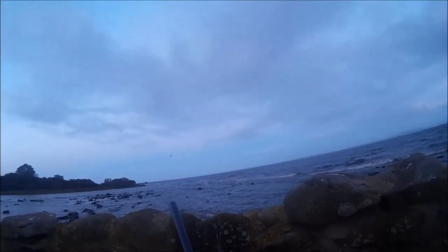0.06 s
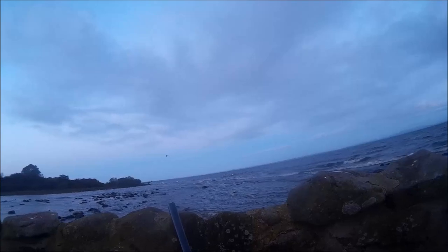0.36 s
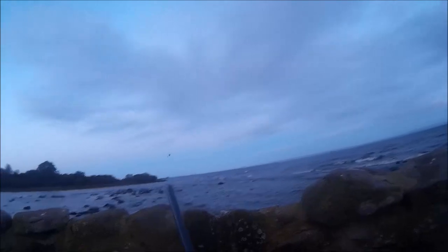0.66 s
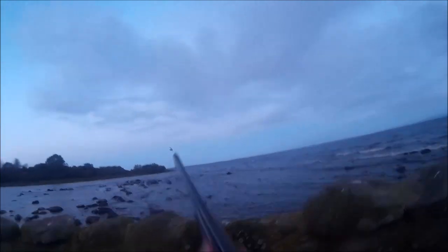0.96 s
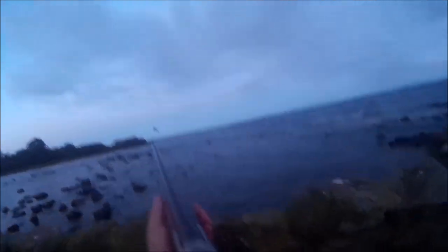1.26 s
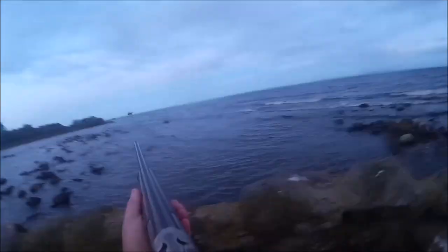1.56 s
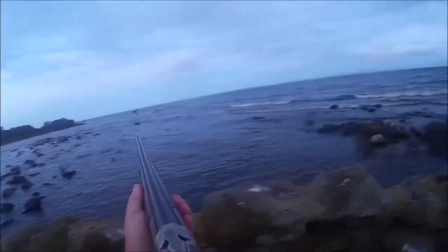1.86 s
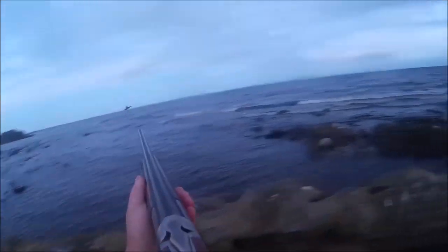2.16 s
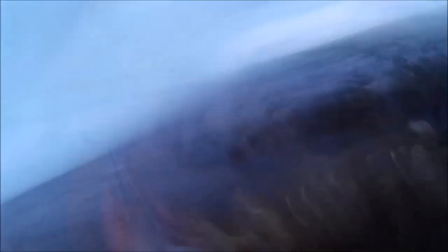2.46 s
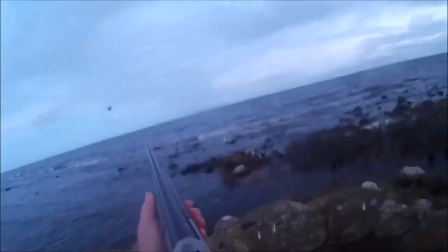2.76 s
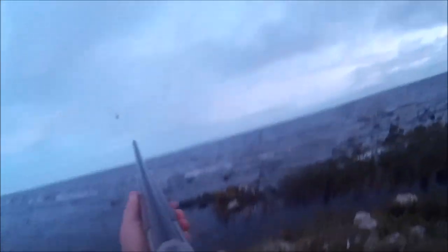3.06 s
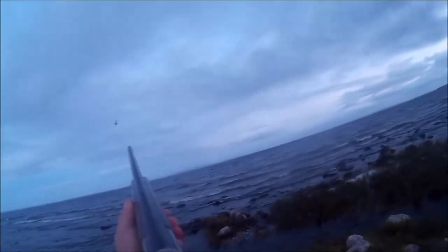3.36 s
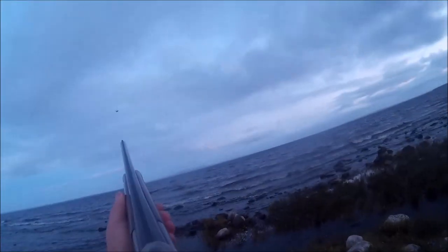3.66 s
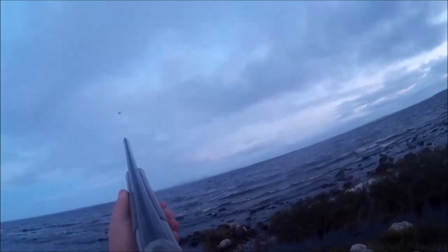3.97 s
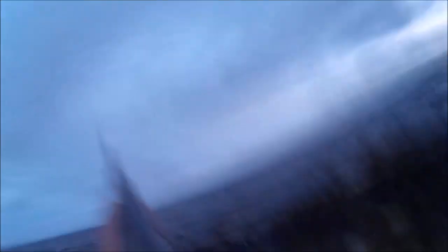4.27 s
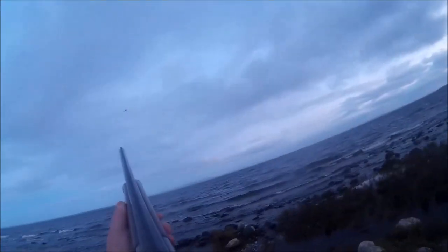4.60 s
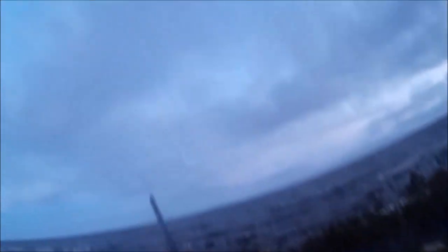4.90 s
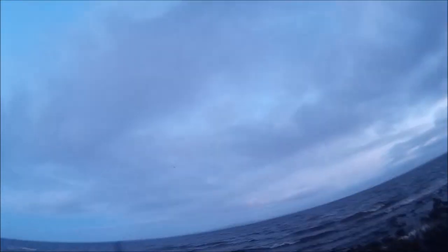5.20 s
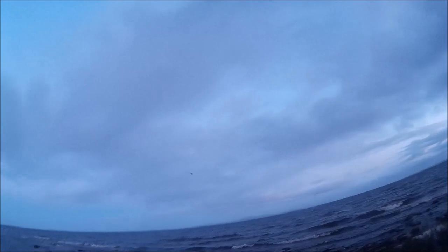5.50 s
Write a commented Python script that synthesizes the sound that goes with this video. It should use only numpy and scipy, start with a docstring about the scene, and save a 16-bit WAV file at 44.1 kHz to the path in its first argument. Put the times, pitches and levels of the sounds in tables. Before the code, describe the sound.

Boxy wind rumbles and slaps against an enclosed microphone as a shotgun fires twice, about two seconds apart, beside softly washing water.

```python
"""Two shotgun shots on a windy lake shore

A head-worn camera hears it all from inside a waterproof case, which booms near 500 Hz and shuts
out the treble. Gusts shake the case, slap it and rush past it over the steady wash of small waves.
Sleeves rustle as the gun comes up, and handling knocks the case. Each blast overloads the recorder
into square waves, the recoil jolts the case, the barrels ring and the echo rolls away over the water."""
import sys
import numpy as np
from scipy import signal
from scipy.fft import rfft, irfft, next_fast_len
from scipy.io import wavfile
from scipy.ndimage import uniform_filter1d

SR = 44100
rng = np.random.default_rng(int(sys.argv[2]) if len(sys.argv) > 2 else 0)


def master_out(mix):
    """Clip the mix to full scale and print it as 16-bit PCM to the path in sys.argv[1]."""
    frames = np.transpose(np.atleast_2d(mix))
    ceiling = np.clip(frames, -1, 1)
    pcm = np.round(ceiling * 32767).astype(np.int16)
    wavfile.write(sys.argv[1], SR, pcm)


N = 248724
T = np.arange(N) / SR


def undb(db):
    """Turn decibels into a number to multiply by."""
    return 10 ** (np.asarray(db) / 20)


def unit(x):
    """Scale a signal to an average size (rms) of 1."""
    return x / np.std(x)


def colour(x, points):
    """Shape the tone along (frequency [Hz], level [dB]) points."""
    hz, db = np.transpose(points)
    size = next_fast_len(N + 8192, True)
    size += size % 2
    freqs = np.maximum(np.arange(size // 2 + 1) * SR / size, 1)
    gain = undb(np.interp(np.log(freqs), np.log(hz), db))
    # minimum phase: the filter rings after a sound, never before it
    cepstrum = irfft(np.log(gain))
    cepstrum[1:size // 2] *= 2
    cepstrum[size // 2 + 1:] = 0
    return irfft(rfft(x, size) * np.exp(rfft(cepstrum)))[:N]


def noise_band(low_hz, high_hz):
    """Noise between two frequencies, of size 1."""
    bandpass = signal.butter(2, [low_hz, high_hz], "band", fs=SR, output="sos")
    return unit(signal.sosfilt(bandpass, rng.standard_normal(N)))


def wander(per_second):
    """A curve of size 1 that glides from one random value to the next."""
    step = max(int(SR / per_second), 2)
    stairs = np.repeat(rng.standard_normal(N // step + 1), step)
    return unit(uniform_filter1d(stairs, step)[:N])


def steady(x, seconds, crest=1.4):
    """Even out a noise's slow changes, keep its flutter and soften surges above crest."""
    x = x / np.sqrt(uniform_filter1d(x ** 2, int(seconds * SR)) + 1e-9)
    surge = uniform_filter1d(uniform_filter1d(2 * x ** 2, size=180), size=180)
    return unit(x / (1 + (surge / crest ** 2) ** 2) ** (1 / 4))


def swell(start, rise, hold, release):
    """Rise in a straight line, hold, then fall to about a third every release seconds."""
    age = T - start
    return np.clip(age / rise, 0, 1) * np.exp(-np.maximum(age - rise - hold, 0) / release)


def fade(start, t60):
    """Start suddenly, then die away by 60 dB in t60 seconds."""
    return (T >= start) * np.exp(-np.log(1000) * np.maximum(T - start, 0) / t60)


def ring(start, hz, t60):
    """One dying tone of something struck."""
    return np.sin(2 * np.pi * hz * (T - start)) * fade(start, t60)


# How much sound gets into the closed case: (frequency [Hz], level [dB])
CASE_TONE = [(25, -26.5), (80, -18.5), (220, -11), (360, -8.5), (440, -3.5), (505, -2.5), (600, -7.5),
             (800, -14.5), (1200, -25.5), (2000, -22.5), (2450, -38), (3200, -53), (5000, -62.5),
             (15000, -69)]

def through_case(x):
    """The case lets in tones near 500 Hz best and muffles the treble."""
    return colour(x, CASE_TONE)


def cased_noise(tone, flutter_db=0):
    """Noise of size 1 heard through the case; flutter_db makes its level flicker quickly."""
    noise = rng.standard_normal(N) * undb(flutter_db * wander(110))
    return unit(through_case(colour(noise, tone)))


# The wind between gusts: (time [s], buffeting strength [dB], rumble strength [dB])
BREEZE = [(0, -61, -75), (.48, -58.5, -69.5), (.66, -62, -52), (.82, -60, -61.5), (1.0, -46, -42.5),
          (1.03, -52.5, -53), (1.12, -37.5, -45.5), (1.41, -43.5, -43.5), (1.58, -37.5, -41),
          (1.615, -50, -48), (1.66, -41, -43), (1.84, -38.5, -38.5), (2.1, -35.5, -39),
          (2.329, -32.5, -36.5), (2.5, -36.5, -47.5), (2.6, -45.5, -41.5), (2.76, -40.5, -44),
          (2.91, -42.5, -45.5), (3.048, -34, -46.5), (3.26, -31, -43), (3.44, -35.5, -43),
          (3.72, -38.5, -47), (3.95, -35, -42), (4.14, -33.5, -43.5), (4.329, -41.5, -45), (4.7, -38, -42),
          (4.98, -39, -46.5), (5.279, -37.5, -53), (5.461, -34, -50), (5.501, -49, -54), (5.55, -37, -46),
          (5.64, -38.5, -51.5)]
# Gusts that shake the case: (time [s], length [s], buffeting strength [dB], rumble strength [dB])
GUSTS = [(0.178, 0.0078, -45, -37.5), (0.212, 0.047, -69, -51.5), (0.56, 0.063, -59, -49),
         (0.702, 0.04, -49.5, -49), (0.899, 0.059, -38, -44), (1.057, 0.031, -31, -36.5),
         (1.103, 0.021, -40, -47.5), (1.16, 0.02, -35.5, -49), (1.223, 0.053, -38, -39.5),
         (1.283, 0.02, -30.5, -44), (1.329, 0.029, -38, -40.5), (1.475, 0.076, -32.5, -36.5),
         (1.554, 0.037, -31, -36), (1.645, 0.033, -35, -33), (1.701, 0.033, -34, -45),
         (1.891, 0.047, -29, -45), (1.996, 0.042, -32, -48), (2.125, 0.056, -34.5, -36.5),
         (2.195, 0.02, -29.5, -35), (2.235, 0.065, -30.5, -37), (2.613, 0.07, -35, -43),
         (2.691, 0.041, -33, -36.5), (2.772, 0.032, -30.5, -34), (3.351, 0.061, -33, -45.5),
         (3.441, 0.011, -31, -43.5), (3.472, 0.011, -34, -44.5), (3.574, 0.059, -33, -45.5),
         (3.8, 0.03, -33, -42), (3.877, 0.052, -28, -48), (4.194, 0.03, -45, -27.5),
         (4.54, 0.12, -39, -42.5), (4.687, 0.11, -32, -45.5), (4.837, 0.039, -35.5, -41.5),
         (5.112, 0.026, -32, -54), (5.192, 0.0194, -33.5, -52), (5.394, 0.041, -30.5, -44)]

def wind_force():
    """Gusts add their power to the breeze; gives the strength of buffeting and of rumble."""
    rise_s, release_s = 0.0031, 0.0079
    times, *levels = np.transpose(BREEZE)
    power = np.array([undb(np.interp(T, times, db)) ** 2 for db in levels])
    for start, length, buffet_db, rumble_db in GUSTS:
        shape = swell(start, rise_s, length - rise_s, release_s)
        power += np.outer(undb([buffet_db, rumble_db]), shape) ** 2
    return np.sqrt(power)


# Tone of the wind's beating and of its rumble, outside the case: (frequency [Hz], level [dB])
BUFFET_TONE = [(40, -21), (180, -11), (300, -4), (420, -3), (470, 0), (515, 4), (565, 0.5), (650, -4),
               (750, -7), (1000, -11), (1400, -20), (2200, -31), (6000, -43.5)]
RUMBLE_TONE = [(20, -2.5), (70, 0.5), (110, -2.5), (180, -8), (320, -11.5), (500, -19.5), (1000, -57)]

def wind_buffeting(buffet_force, rumble_force):
    """Swirls of air beat on the case, making it boom and rumble."""
    boom = steady(cased_noise(BUFFET_TONE, flutter_db=2), seconds=0.035, crest=2.1)
    rumble = steady(cased_noise(RUMBLE_TONE, flutter_db=5), seconds=0.088, crest=1.7)
    return undb(0.17) * boom * buffet_force + undb(1.76) * rumble * rumble_force


# Slow swells of passing air: (time [s], rise [s], hold [s], release [s], strength [dB])
AIR_SWELLS = [(2.927, 0.17, 0.08, 0.05, -51), (3.181, 0.042, 0.044, 0.044, -47.5),
              (3.305, 0.087, 0.1, 0.042, -42), (3.512, 0.046, 0.054, 0.045, -43.5),
              (3.609, 0.13, 0.18, 0.26, -42.5), (4.338, 0.099, 0.1, 0.048, -54.5),
              (4.525, 0.04, 0.15, 0.12, -48.5), (5.03, 0.057, 0.086, 0.052, -49.5),
              (5.169, 0.043, 0.028, 0.26, -47.5), (5.536, 0.1, 0.054, 0.046, -64.5)]
# Tone of the rush and of the hiss at its peaks, outside the case: (frequency [Hz], level [dB])
RUSH_TONE = [(50, -20), (250, 1.5), (380, 3), (500, -7.5), (700, 1.5), (1100, 5), (1500, 1.5), (2000, -6),
             (2400, -4.5), (3000, -3), (4000, -10), (6000, -14)]
PEAK_HISS_TONE = [(500, -39), (1200, -8.5), (2000, -1.5), (2400, 4), (3000, 4), (4000, 0), (6000, -8)]

def wind_rush(buffet_force):
    """Air streams past the case with a rushing noise that gets brighter as it gets stronger."""
    swells = sum(undb(db) * swell(*timing) ** 0.82 for *timing, db in AIR_SWELLS)
    waver = undb(0.04 * wander(14))
    gust_flow = undb(-63) * (buffet_force / undb(-31)) ** 0.92  # the rush grows with the buffeting
    flow = np.hypot(swells * waver, gust_flow)
    rush = steady(cased_noise(RUSH_TONE, flutter_db=2), seconds=0.037, crest=3.7)
    hiss = cased_noise(PEAK_HISS_TONE, flutter_db=3)
    hiss_gain = undb(-50.5) * (flow / undb(-41)) ** 2.1  # 2.1 dB more hiss for each dB of flow
    return undb(9.5) * rush * flow + hiss * hiss_gain


# Tone of the waves outside the case: (frequency [Hz], level [dB])
WAVE_TONE = [(30, -11.5), (80, -3), (170, -8), (400, -3.5), (495, 2.5), (580, -1.5), (650, -2),
             (1200, -0.5), (2000, -1.5), (6000, -7)]

def waves():
    """Small waves wash steadily on the stones."""
    return cased_noise(WAVE_TONE) * undb(-60 + 0.39 * wander(1.1))


# Small rises in the recorder's hiss: (time [s], boost [dB])
HISS_BOOST = [(.7, 1.5), (1.2, 2.5), (1.7, 2.5), (1.78, 1), (2.9, 1.5), (3.1, 4), (3.9, 2), (4.05, 2.5),
              (4.8, 1), (5.1, 5.5), (5.43, 4), (5.55, 2.5)]
# Spells of the recorder's whine: (time [s], hold [s], level [dB])
WHINES = [(.95, .6, -96), (2.9, .85, -94), (4.852, 0.46, -99.5)]

def recorder_noise():
    """The recorder makes a faint hiss, and a thin whine that comes and goes."""
    whine_hz, half_width_hz = 9520, 45
    times, boost_db = np.transpose(HISS_BOOST)
    hiss_gain = undb(-82.5 + np.interp(T, times, boost_db))
    hiss = unit(colour(rng.standard_normal(N), [(100, -1.5), (3000, 6.5), (5500, 1), (15000, 0)]))
    whine = noise_band(whine_hz - half_width_hz, whine_hz + half_width_hz)
    whine_gain = sum(undb(db) * swell(start, 0.15, hold, 0.054) for start, hold, db in WHINES)
    return hiss * hiss_gain + whine * whine_gain


def hit_case(hits, boom_db):
    """Each hit pushes the case in and lets it spring back; a longer push sounds duller."""
    boom_hz, boom_width_hz = 517, 180  # the air ringing inside the case
    size = 4096
    shell = through_case(signal.unit_impulse(N))[:size]
    air_filter = signal.iirpeak(boom_hz, boom_hz / boom_width_hz, fs=SR)
    response = shell + undb(boom_db) * signal.lfilter(*air_filter, shell)
    out = np.zeros(N)
    for start, db, push_s in hits:
        first = int(start * SR) - size // 2
        age = (T[first:first + size] - start) / push_s
        push = -age * np.exp(-age ** 2 / 2)
        boom = signal.fftconvolve(push, response)[:size]
        out[first:first + size] += undb(db) * boom / np.abs(boom).max()
    return out


# Slaps of wind on the case: (time [s], peak level [dB], push time [s])
WIND_SLAPS = [(.185, -30.5, 0.00063), (.599, -38, 0.00033), (.886, -40, 0.00065), (1.066, -23, 0.00024),
              (1.164, -26.5, 0.00054), (1.238, -21, 0.00054), (1.261, -19.5, 0.00044),
              (1.290, -21, 0.00022), (1.429, -22.5, 0.00037), (1.435, -28.5, .0004),
              (1.486, -22.5, 0.00031), (1.560, -21.5, 0.00027), (1.575, -20.5, 0.00018),
              (1.640, -21.5, 0.00064), (1.711, -16.5, 0.00082), (1.784, -24.5, 0.00063),
              (1.932, -30, 0.00017), (2.010, -16.5, 0.00051), (2.044, -19.5, 0.00037), (2.163, -22, 0.0004),
              (2.240, -25, 0.0004), (2.264, -20.5, 0.00035), (2.545, -23, 0.00052), (2.686, -18, 0.00052),
              (2.780, -23, 0.00076), (2.791, -20.5, 0.00037), (2.846, -16.5, 0.00053),
              (2.8555, -19, 0.00051), (2.964, -21.5, 0.00076), (3.245, -24, 0.00057), (3.358, -19, 0.0005),
              (3.450, -22.5, .0003), (3.475, -18.5, 0.00029), (3.661, -23.5, 0.00023), (3.774, -27, 0.0005),
              (3.816, -22, 0.00037), (3.872, -18.5, 0.0003), (3.914, -22.5, 0.0006), (3.950, -17, 0.00046),
              (3.984, -17, 0.0003), (3.995, -20, 0.00023), (4.092, -20, 0.00019), (4.122, -17.5, 0.00016),
              (4.635, -21, 0.0003), (4.683, -24, 0.00051), (4.717, -21, 0.00025), (4.753, -28, 0.0004),
              (4.814, -20.5, 0.0004), (5.123, -20, 0.00045), (5.187, -21.5, 0.00033),
              (5.202, -17.5, 0.00033), (5.297, -19, 0.00046), (5.349, -23.5, 0.00055),
              (5.392, -15.5, 0.00041), (5.406, -18.5, 0.00021), (5.540, -22.5, 0.00077)]

def wind_slaps():
    """Single swirls of air slap the case and set the air inside booming."""
    return hit_case(WIND_SLAPS, boom_db=5)


# Faint ticks of handling: (time [s], level [dB], top frequency [Hz])
HAND_TICKS = [(.436, -70, 3800), (3.261, -72, 7000), (5.409, -68, 7000)]

def hand_ticks():
    """Hands tick lightly against the gun, each touch a short burst of noise."""
    return sum(undb(db) * noise_band(1400, top_hz) * fade(start, t60=0.056)
               for start, db, top_hz in HAND_TICKS)


# Swells of soft rustling noise: (time [s], rise [s], hold [s], release [s], level [dB])
RUSTLES = [(0.642, 0.01, .012, .012, -64.5), (0.803, 0.41, 0.5, .04, -59.5), (2.504, .05, 0.12, 0.056, -64),
           (4.42, .19, .035, .025, -59)]

def soft_rustles():
    """Soft rustling noise: sleeves as the gun comes up, and the first shot's lingering echo."""
    rustle = cased_noise([(300, -22), (1500, -3), (2200, -4), (3000, 5.5), (8000, 5)], flutter_db=2)
    return rustle * sum(undb(db) * swell(*timing) for *timing, db in RUSTLES)


# Hard knocks on the case: (time [s], peak level [dB], push time [s])
GUN_KNOCKS = [(1.7340, -6, 0.00042), (1.7360, -13.5, 0.00042), (2.3922, -12.5, 0.000059),
              (2.3944, -12.5, 0.00011), (2.4125, -21, 0.00086), (2.4180, -8, 0.00042),
              (2.4230, -20, 0.00058), (2.4325, -28, 0.000071), (2.4405, -33, 0.000067),
              (2.4432, -15, 0.00019), (2.4490, -13.5, 0.00038), (2.4735, -25, 0.00018),
              (4.1873, -7, 0.00014), (4.1888, -3, 0.00032), (4.2105, -12, 0.0008), (4.2203, -19, 0.0011),
              (4.2305, -14, 0.00067), (4.2335, -32, 0.000081), (4.2385, -27, 0.000067),
              (4.2402, -13.5, 0.00044), (4.2555, -33, 0.00006), (4.2745, -27, 0.00036)]

def gun_knocks():
    """Handling, the gun's moving parts and its recoil knock the case, with little boom."""
    return hit_case(GUN_KNOCKS, boom_db=-29.5)


# The two shots; a fade is the time to drop by 60 dB:
# (time [s], shock [dB], gas [dB], gas fade [s], case pitch [Hz], case boom [dB], case fade [s],
#  thud [dB], deep thump [dB], echo [dB], echo fade [s])
SHOTS = [(2.396, 15, -9, 0.13, 503.8, -0.5, 0.079, -22, -37, -30, 0.71),
         (4.191, 14, -8, 0.1, 479.7, 4.5, 0.055, -14.5, -26.5, -40.5, 0.6)]
# Tone of the gas blast and of its echo, outside the case: (frequency [Hz], level [dB])
GAS_TONE = [(40, -8), (100, -1.5), (200, 3.5), (500, 7), (750, 4.5), (1500, -1), (3000, 0), (7000, -2),
            (15000, -12.5)]
ECHO_TONE = [(60, -10.5), (500, 3.5), (1500, -1.5), (3000, 4), (7000, -8), (15000, -21)]

def shots():
    """A shock wave slams the case, the gun's gas shakes it, the recoil thuds and the shore echoes."""
    gas = steady(cased_noise(GAS_TONE), seconds=0.0093)
    echo = steady(cased_noise(ECHO_TONE, flutter_db=8.5), seconds=0.02)
    crack = noise_band(1200, 4900)
    out = np.zeros(N)
    for (start, shock_db, gas_db, gas_fade, case_hz, case_db, case_fade,
         thud_db, thump_db, echo_db, echo_fade) in SHOTS:
        out += undb(shock_db) * ring(start, hz=459, t60=0.0061)
        out += undb(-11.5) * crack * fade(start, t60=0.0097)
        out += undb(gas_db) * gas * fade(start, gas_fade)
        out += undb(case_db) * ring(start, case_hz, case_fade)
        out += undb(thud_db) * ring(start, hz=282.3, t60=0.17)  # recoil through the shoulder
        out += undb(thump_db) * ring(start, hz=69.4, t60=0.17)  # head and camera rock back
        out += undb(echo_db) * echo * fade(start, echo_fade)
        out += barrel_ring(start)
    return out


# Ringing of the steel barrels: (frequency [Hz], level [dB], time to drop by 60 dB [s])
BARREL_TONES = [(2180, -55, 0.5), (3800, -70.5, 0.53), (7120, -72, 0.39)]

def barrel_ring(start):
    """A shot sets the barrels ringing in clusters of close tones, each played as narrow noise."""
    spread = 2 ** (1 / 6)  # a sixth of an octave either side
    return sum(undb(db) * noise_band(hz / spread, hz * spread) * fade(start, t60)
               for hz, db, t60 in BARREL_TONES)


def scene():
    """Everything as it arrives inside the case, in one channel."""
    buffet_force, rumble_force = wind_force()
    wind = wind_buffeting(buffet_force, rumble_force) + wind_rush(buffet_force)
    return (wind + waves() + wind_slaps() + hand_ticks() + soft_rustles() + gun_knocks() + shots())[None]


def record(dry):
    """The recorder adds its own noise, flattens loud peaks and cuts the top treble; the sound fades out over
    its last few milliseconds."""
    full_scale, top_hz = 0.2, 15600
    # overloading at four times the sample rate keeps stray tones low
    fine = signal.resample_poly(dry + recorder_noise(), 4, 1, axis=1, padtype="edge")
    flattened = np.clip(fine, -full_scale, full_scale)
    overloaded = signal.resample_poly(flattened, 1, 4, axis=1, padtype="edge")
    fade_out = np.clip((T[-1] - T) / 0.005, 0, 1)
    treble_cut = signal.ellip(8, 0.05, 60, top_hz, fs=SR, output="sos")
    return signal.sosfilt(treble_cut, overloaded * fade_out)


dry = scene()
out = record(dry)
master_out(out)
```